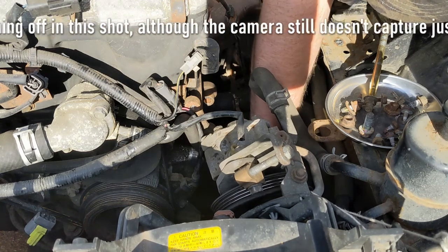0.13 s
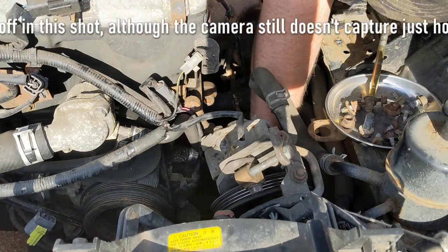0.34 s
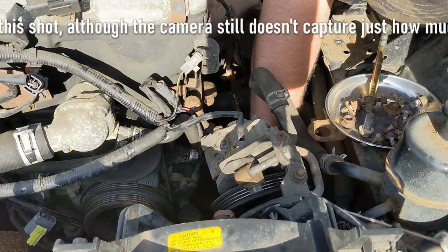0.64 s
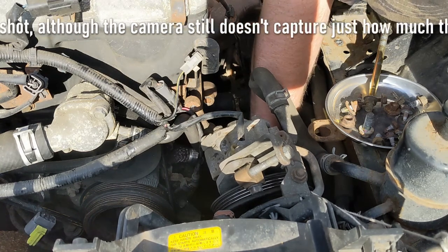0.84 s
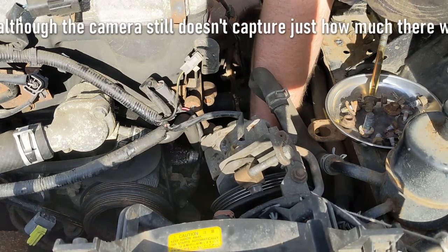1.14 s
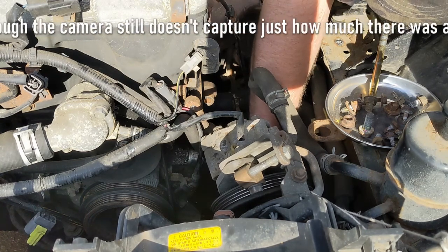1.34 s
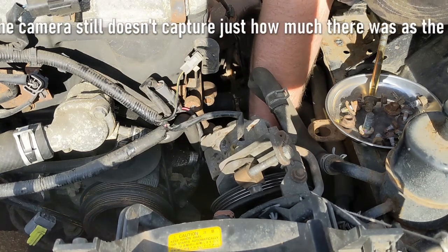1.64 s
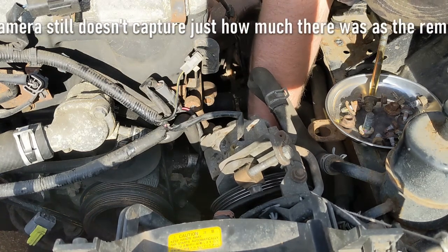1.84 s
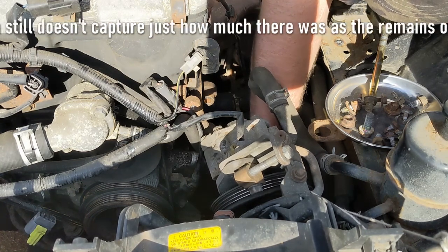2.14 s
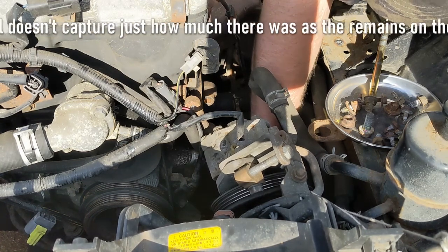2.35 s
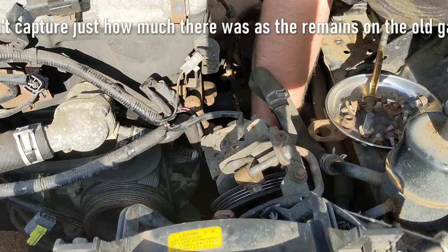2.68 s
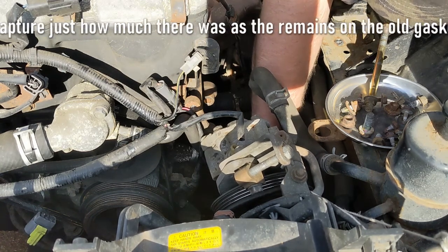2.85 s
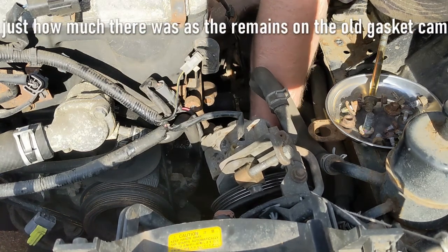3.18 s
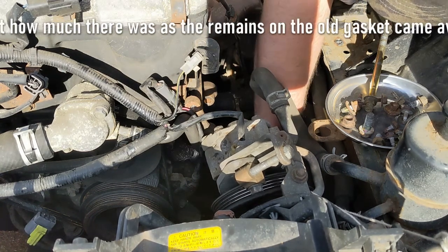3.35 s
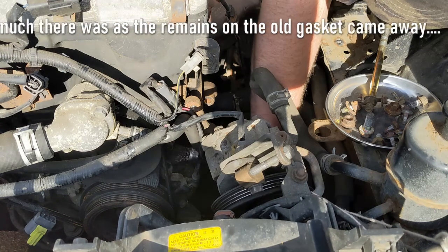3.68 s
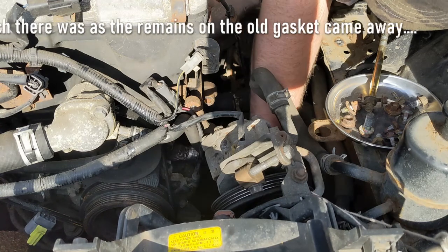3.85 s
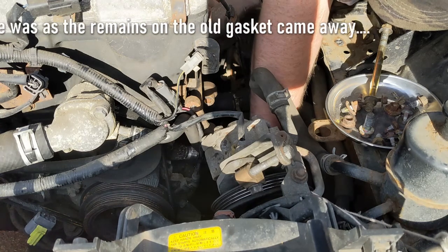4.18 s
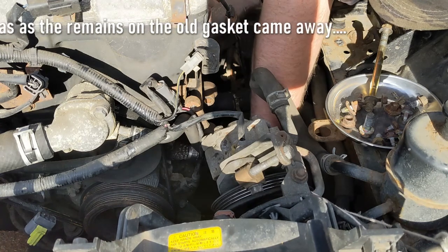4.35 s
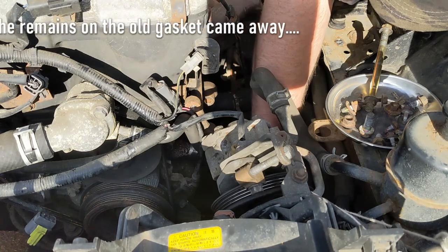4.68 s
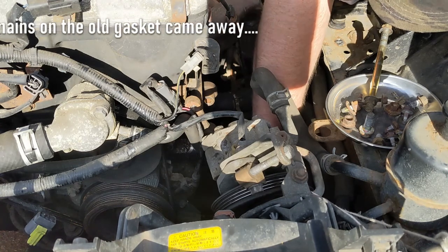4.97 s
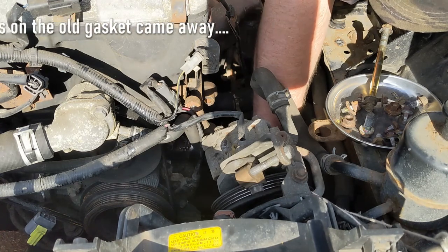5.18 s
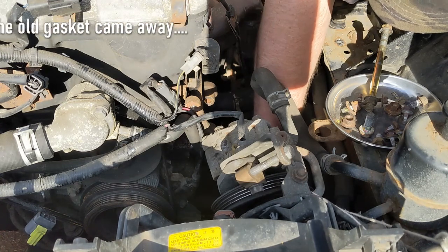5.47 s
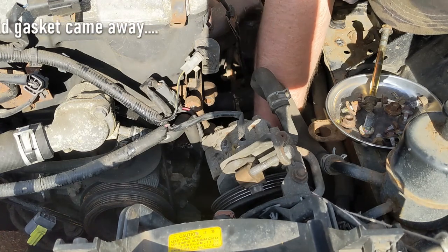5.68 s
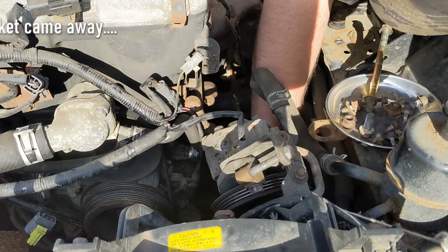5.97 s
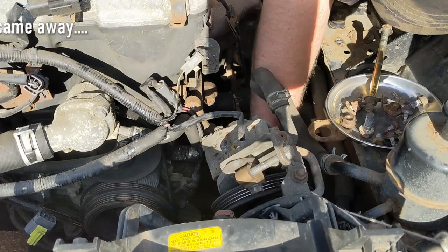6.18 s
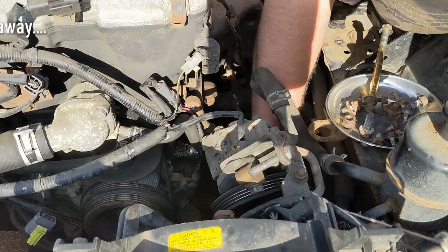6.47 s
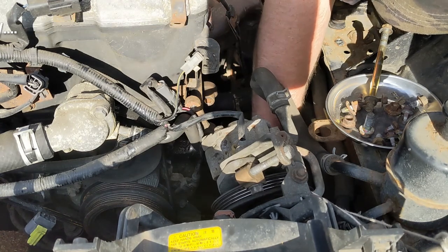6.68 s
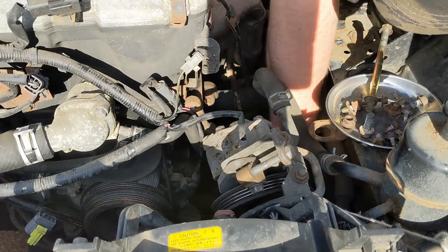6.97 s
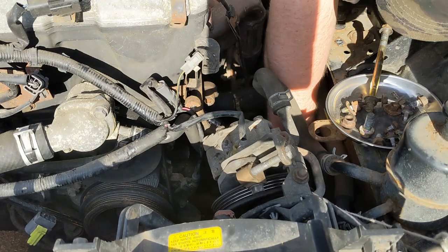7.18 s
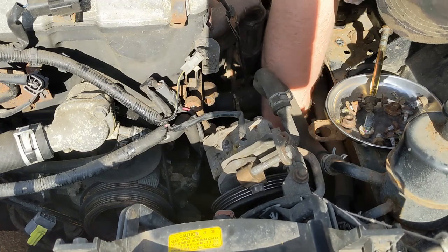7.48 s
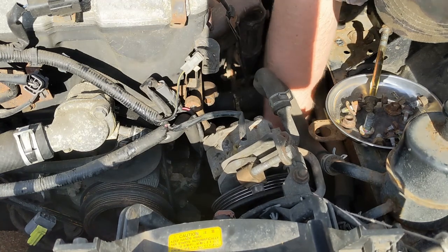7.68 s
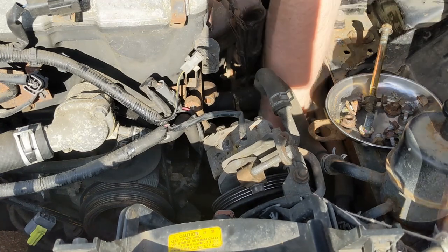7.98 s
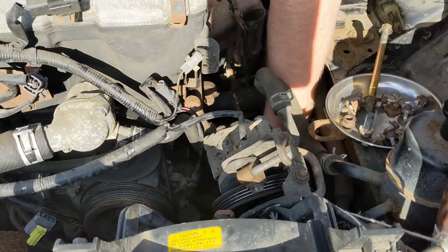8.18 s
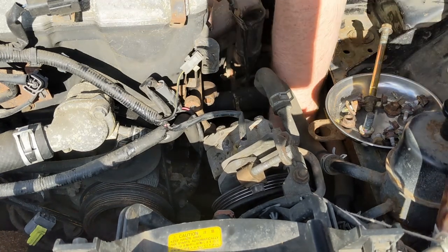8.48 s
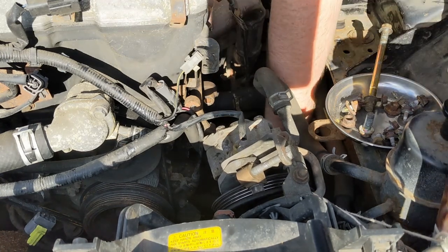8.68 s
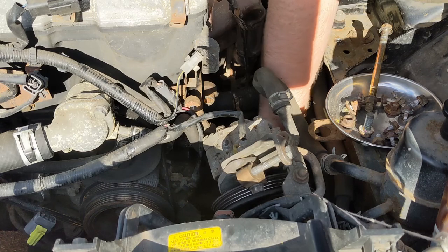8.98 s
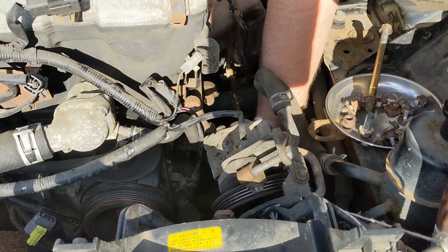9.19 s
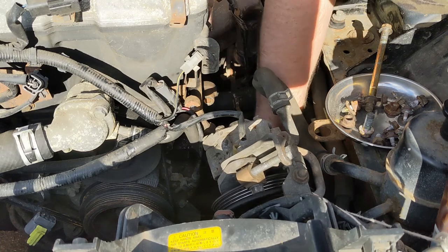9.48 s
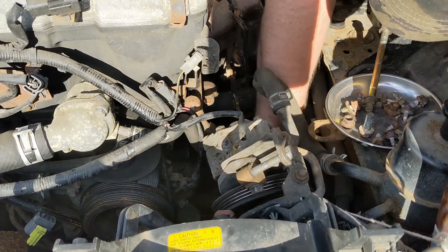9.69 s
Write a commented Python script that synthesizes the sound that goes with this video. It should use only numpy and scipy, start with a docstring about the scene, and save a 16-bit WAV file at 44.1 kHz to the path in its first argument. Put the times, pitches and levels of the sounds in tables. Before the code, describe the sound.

From 0 s a handheld air-driven polisher is already at full speed on an engine part, close and outdoors: a dense buzzing whine of many harmonics above a roughly 290 Hz shaft rate, with gritty midrange grinding and bright exhaust hiss. Pressure bends the pitch slightly down around 1.5 and 3.2 s, where a harder push makes a scraping surge and a dull thump. Low wind buffets left and right separately, strongest in the first three seconds. At 6.9 s the pad snags; the whine stops in a rapid metallic clatter. Until 8.7 s it is quiet: thin outdoor air, soft rubbing and cloth, faint squeaks around 7.2 to 7.6 and 8 s, light knocks near 7.5, 7.75 and 8.3 s, dull bumps and wind thumps. At 8.73 s a small knock, then the tool growls up within a quarter second to full whine, slightly higher, cutting off abruptly at 9.55 s.

```python
"""A buzzing whine rides on gritty grinding and rushing air: a handheld vane motor spins a polishing pad on an engine
part, outdoors. The whine is sines at multiples of the shaft speed; grind and exhaust are shaped noise pulsing once
a turn. Pressure slows the shaft and the pad chatters. The pad snags and stalls; knocks, rubbing and squeaks follow
as the tool is handled, then it spins up again. Dull thumps are sagging sines; wind noise buffets two microphone ports."""
import sys
import numpy as np
from scipy import signal
from scipy.fft import rfft, irfft, next_fast_len
from scipy.io import wavfile
from scipy.ndimage import uniform_filter1d, map_coordinates

SR = 44100
rng = np.random.default_rng(int(sys.argv[2]) if len(sys.argv) > 2 else 0)


def generate_wav(sig):
    """Save sig (samples, or channels by samples) to the path in sys.argv[1] as 16-bit PCM at SR."""
    pcm = np.round(np.clip(np.atleast_2d(sig).T, -1, 1) * 32767).astype(np.int16)
    wavfile.write(sys.argv[1], SR, pcm)


N = 433492
TIME = np.arange(N) / SR  # s

# All levels in the tables are relative; the mix below trims each layer.

# the two tool runs: (time [s], grind [dB], exhaust hiss over grind [dB], hum at the shaft rate [dB])
LONG_RUN = [(0.0, -30.5, 0.5, -64), (0.95, -31.5, 0.5, -71), (1.28, -30, -1.5, -78), (1.88, -30.5, 1, -65),
            (2.4, -30.5, -0.5, -77), (3.01, -30, 0.5, -74), (3.24, -31.5, 3.5, -74), (3.3, -31, -3.5, -55),
            (3.68, -31, -2.5, -60), (3.99, -29.5, -1, -64), (4.27, -30.5, -2, -63), (4.85, -31, -1, -61.5),
            (5.46, -30, -0.5, -57), (5.75, -30.5, 0, -59), (5.98, -31.5, -1, -51), (6.25, -29, -1.5, -65),
            (6.52, -30.5, 0, -56.5), (6.79, -30, -1, -56.5), (6.88, -33.5, 1.5, -64.5)]
SHORT_RUN = [(8.73, -56, -12, -87), (8.777, -42.5, -9, -83), (8.784, -30.5, -15, -77),
             (8.802, -28, -4, -76), (8.856, -32.5, 3, -55), (8.94, -30, -3.5, -50.5),
             (9.224, -31, -1.5, -54), (9.442, -31.5, -0.5, -68), (9.55, -32.5, 1, -63)]
# pressure on the pad slows the shaft: (time [s], shaft speed [Hz])
SHAFT_SPEED = [(0, 293.6), (.74, 292.8), (.98, 291), (1.21, 289.1), (1.56, 286.8), (1.9, 287.5),
               (1.99, 290), (2.22, 290.6), (2.29, 294.5), (2.55, 295.3), (2.75, 295), (2.95, 291.5),
               (3.12, 287.7), (3.2, 283), (3.24, 284.5), (3.33, 295.6), (3.43, 297.8), (3.74, 297.4),
               (3.99, 293.2), (4.13, 292.3), (4.5, 294.6), (4.95, 295.6), (5.18, 294.9), (5.42, 293.5),
               (5.64, 293.6), (6, 296), (6.19, 292.7), (6.36, 290.1), (6.46, 290.2), (6.58, 293.6),
               (6.72, 292.2), (6.82, 293.3), (6.88, 282), (8.73, 172.5), (8.776, 180.3), (8.802, 212.7),
               (8.856, 270.6), (8.882, 282.4), (8.94, 294), (8.99, 297.7), (9.09, 298.5), (9.224, 296.6),
               (9.44, 298.5), (9.55, 297.8)]
# strong lines: (multiple of the shaft [ratio]); the last is the pad chatter
STRONG_LINES = np.array([3, 6, 9, 12, 15, 24, 27, 30, 33, 36, 39, 48, 28 / 3])
# echoes in the engine bay colour each strong line differently at each port as the speed moves it.
# shaft speeds of the first five columns in the three tables below: (speed [Hz])
COLUMN_SPEEDS = [287.3, 290.4, 292.8, 294.6, 297.1]
# a row per strong line, the sixth column holds for the whole second run: (left level [dB] x 6)
LINE_LEFT = [(-49, -46, -56, -59, -64, -54), (-52, -63, -62, -58, -55, -56), (-56, -59, -48, -44, -45, -55),
             (-46, -46, -38.5, -42.5, -46, -51), (-55, -55, -41.5, -38.5, -49, -52),
             (-40, -34.5, -32.5, -32.5, -28, -35.5), (-47, -49, -50, -43, -46, -48),
             (-44, -47, -55, -45, -39, -42.5), (-51, -51, -47, -45, -39, -36.5),
             (-54, -50, -38, -50, -53, -43.5), (-44, -34, -53, -47, -40, -42),
             (-54, -57, -46, -51, -52, -47), (-41.5, -50, -58, -57, -59, -62)]
# same layout: (right level [dB] x 6)
LINE_RIGHT = [(-42, -39.5, -44, -43.5, -42.5, -51), (-44, -50.5, -43, -41.5, -47, -39.5),
              (-50, -55.5, -38, -37, -35.5, -37.5), (-36, -43, -38, -39.5, -47, -35.5),
              (-53, -43, -58, -42, -41, -37), (-34.5, -33.5, -33.5, -38.5, -49, -34),
              (-52, -48, -43, -42, -45, -41.5), (-39, -40, -52.5, -56, -41, -46),
              (-30.5, -43.5, -47, -42, -40.5, -40), (-48, -48, -46, -49, -43, -52),
              (-41, -39, -46, -41.5, -43, -41.5), (-41.5, -46, -42.5, -43, -39, -42),
              (-33.5, -40, -55.5, -62, -61, -53.5)]
# same layout: (phase by which the left leads [rad] x 6)
LINE_LEAD = [(0.1, -4.7, -1.3, -2, -2, 0), (0.3, -4.5, 0, -3.3, -1.5, -1.5), (-0.3, 7, -3.5, 1.4, 0.6, 3),
             (4, -0.2, -2.4, 0.9, 4, 1), (1.3, 2.3, 4, 4, 0, 1.5), (-2, -2.5, -2.5, -2.32, 1.3, 1.34),
             (-1, -2.5, -0.5, -2.4, -1.2, -4.5), (1.4, 1.7, 0, -4, -2, -5.5),
             (0.1, -1.5, -0.5, -2.5, -2, -2.5), (4.5, -5.5, -8.5, -1.5, 9, -8), (1.5, 3, 2.3, 0.6, 2, 4),
             (-6.5, -4, -3, 4, -5, -5), (0.5, -2.7, 1, 13, 2.2, 3)]
# weaker shaft orders: (multiple of the shaft [ratio], left level [dB], right level [dB])
WEAK_ORDERS = [(2, -55.5, -53.5), (18, -49, -53), (21, -51.5, -55), (25, -52.5, -45), (26, -53, -51),
               (28, -53, -52), (29, -59.5, -52.5), (31, -50.5, -50), (32, -62, -49), (34, -48, -54),
               (35, -58.5, -53.5), (37, -48.5, -47), (38, -55.5, -52.5), (40, -49.5, -47), (41, -51.5, -54),
               (42, -52.5, -48), (44, -58.5, -54), (45, -54, -55), (47, -58.5, -51), (49, -57.5, -48),
               (50, -57, -45.5), (51, -56, -45), (52, -54.5, -46), (53, -65, -54)]
# colour of the grinding noise: (frequency [Hz], level [dB])
GRIND_COLOUR = [(150, -50.5), (250, -20.5), (296, -22), (452, -24), (576, -6.5), (798, -11), (879, -10),
                (957, -10.5), (1390, -2.5), (1590, -18), (1770, 3), (1950, 1), (2370, -2), (3800, -5),
                (4500, -6), (5850, -25), (9900, -120)]
# colour of the exhaust air: (frequency [Hz], level [dB])
EXHAUST_COLOUR = [(2060, -22.5), (3500, -3), (3800, -20), (4440, -4.5), (5680, -5.5), (6810, -7.5),
                  (8870, -5), (10200, -11), (13000, -11.5), (14300, -8), (15700, -9.5)]
# stereo lean of grind and exhaust: (frequency [Hz], left over right [dB])
TOOL_LEAN = [(60, 6), (99, 6), (160, -10.5), (270, 0), (450, -2), (740, -5.5), (1220, -4), (2010, -2.5),
             (3330, -3.5), (5500, -3.5), (9080, -2), (15000, -6.5)]
# resonances of the housing and the part under the pad: (frequency [Hz], width [Hz], level [dB])
HOUSING_MODES = [(552, 30, 7), (680, 31.3, 3.5), (1176, 370, 3.5), (1780, 100, 0), (2359, 96, 9.5),
                 (4500, 820, -2.5)]
# resonances of the exhaust port: (frequency [Hz], width [Hz], level [dB])
PORT_MODES = [(6730, 460, 2), (9160, 2100, -10.5), (11940, 170, -8.5), (14800, 720, -7.5)]
# loose vanes, pad scrape and low drone: (frequency [Hz], width [Hz], level [dB])
RATTLE_MODES = [(540, 70, 0), (680, 90, -1)]
SCRAPE_MODES = [(2390, 400, 0), (3300, 900, -5.5), (4730, 350, 2.0)]
DRONE_MODES = [(382, 140, 0)]
# tool against metal:
# (time [s], level [dB], low knock [dB], bright ring [dB], noise decay t60 [s], left over right [dB])
KNOCKS = [(6.8848, -9.5, -14, -9, 0.058, -9), (6.8918, -11, -8, 1.5, 0.091, -9),
          (6.8964, -9, -16, -13, 0.085, -1), (6.9053, -18.5, -8, 3, 0.08, -7.5),
          (6.9094, -17, -32, -20, 0.06, -6.5), (6.9238, -18.5, -23.5, -6, 0.11, -7.5),
          (6.9363, -27.5, -2, 6.5, 0.051, -8.5), (7.0004, -44, -3.5, -1, 0.092, -7),
          (7.5047, -24, -12, 0.5, 0.063, -6), (7.5166, -28.5, -6.5, -10.5, 0.078, -10),
          (7.7491, -30, 7, -10, 0.11, -5.5), (7.8025, -47.5, -1, -16, 0.16, -10),
          (7.9533, -58, 4, -16, 0.048, -1.0), (8.0254, -46.5, -25, -2, 0.06, -12.5),
          (8.2577, -39, -1, -6, 0.12, -6.5), (8.3584, -40.5, -7, 0, 0.083, -7),
          (8.7306, -35, -21.5, -27, 0.06, -16.5), (8.7829, -21, -7.5, -17, 0.06, -1.5)]
# modes of the struck part, low to high: (frequency [Hz], width [Hz], level [dB])
LOW_MODES = [(390, 420, -7), (652, 91, 10)]
MID_MODES = [(1195, 280, -2.5), (2000, 400, 1.5), (3230, 950, -7)]
HIGH_MODES = [(4490, 490, 6), (8440, 2000, -5.5), (11700, 13000, -13)]
# dull thumps with sagging pitch:
# (time [s], level [dB], first pitch [Hz], last pitch [Hz], decay t60 [s], left over right [dB])
THUMPS = [(.318, -29, 312, 131, 0.083, -23), (0.89, -33.5, 590, 136, 0.11, 28),
          (3.288, -24.5, 746, 720, 0.11, -10), (7.751, -36, 700, 119, 0.57, -2),
          (7.953, -35.5, 750, 116, 0.13, 25), (8.225, -42, 503, 151, 0.091, 20)]
# steady wind on the ports: (time [s], level [dB])
STEADY_WIND = [(0.0, -60), (0.23, -57), (2.13, -62.5), (2.94, -55.5), (3.63, -67), (4.29, -66.5),
               (4.79, -56), (5.08, -64), (5.63, -59), (6.48, -68.5), (6.76, -65), (7.34, -64), (7.82, -61),
               (7.98, -65.5), (8.29, -58), (8.5, -69), (8.79, -75), (9.11, -56), (9.4, -63), (9.45, -76)]
# single eddies: (time [s], level [dB], left over right [dB], decay t60 [s], starting pitch of the push [Hz])
GUSTS = [(0.044, -42, 23, 0.22, 105), (0.119, -45, -0.5, 0.22, 61.9), (0.191, -40, -16, 0.22, 159),
         (0.268, -36, -28, 0.21, 167), (0.319, -28, -22.5, 0.2, 231), (0.446, -32, 11, 0.22, 86.1),
         (0.613, -33.5, 14, 0.19, 213), (0.789, -50, -2.5, 0.22, 86.1), (0.894, -29.5, 27.5, 0.22, 186),
         (0.958, -34, -1.5, 0.27, 199), (1.041, -33.5, 10, 0.2, 186), (1.121, -36, 21, 0.16, 88.8),
         (1.221, -41, 13, 0.22, 170), (1.289, -40, -12, 0.22, 86.1), (1.482, -39.5, 29, 0.19, 191),
         (1.53, -43, 14, 0.19, 175), (1.651, -42, 21, 0.2, 199), (1.782, -37, 13, 0.22, 118),
         (1.819, -37, 12, 0.22, 80.7), (1.867, -40, -6, 0.22, 88.8), (1.919, -44, -13, 0.22, 72.7),
         (2.133, -42, 11.5, 0.25, 108), (2.229, -33.5, 24.5, 0.24, 228), (2.309, -32, 4.5, 0.27, 105),
         (2.392, -34, 14, 0.17, 170), (2.429, -45, -8, 0.2, 75.4), (2.557, -38, 9.0, 0.22, 113),
         (2.612, -48, 5, 0.26, 96.9), (2.681, -32, -7, 0.2, 80.7), (2.759, -33, 7, 0.22, 159),
         (2.829, -39, 14.0, 0.2, 102), (2.917, -35.5, -11, 0.22, 156), (2.959, -41, 2, 0.22, 132),
         (3.072, -39, 22.0, 0.19, 186), (3.139, -44, 17, 0.22, 137), (3.279, -24, 4, 0.25, 94.2),
         (3.349, -37, 11, 0.25, 110), (3.408, -36, 10, 0.21, 143), (4.122, -49, 6.5, 0.22, 96.9),
         (4.628, -36, 18, 0.22, 196), (4.689, -38, 7.5, 0.22, 64.6), (4.768, -42, 15, 0.15, 108),
         (4.849, -44.5, -12, 0.22, 156), (4.94, -38, 17.0, 0.22, 88.8), (5.149, -53, -4.0, 0.22, 61.9),
         (6.63, -39.5, -6, 0.22, 223), (6.739, -46.5, -4.0, 0.22, 99.6), (6.987, -44, 10.0, 0.24, 80.7),
         (7.331, -44, -8, 0.25, 83.4), (7.772, -30, -5.5, 0.28, 116), (7.858, -34, 11, 0.24, 110),
         (7.948, -31.5, 25, 0.15, 229), (8.096, -43, 24, 0.22, 96.9), (8.222, -37.5, 16, 0.22, 83.4),
         (8.299, -48.5, 1.0, 0.22, 61.9), (8.369, -43, 6.5, 0.26, 110), (8.889, -44, -7.0, 0.22, 194),
         (8.976, -36, 13, 0.22, 91.5), (9.06, -27, 12.5, 0.19, 170), (9.29, -34.5, 20, 0.21, 172),
         (9.446, -37.5, 11.0, 0.26, 153)]
# colour of the wind rumble: (frequency [Hz], level [dB])
BUFFET_COLOUR = [(15, -47), (25, 1.5), (91, 16), (299, 2.5), (430, -32), (568, -20.5), (700, -25.5),
                 (910, -36), (1540, -120)]
# brighter band of strong eddies: (frequency [Hz], width [Hz], level [dB])
FLAP_MODES = [(317, 61, 0)]
# hand and sleeve on the engine: (time [s], rubbing [dB], treble of the cloth [dB])
RUSTLE = [(6.94, -57, -71), (6.986, -51, -56), (7.072, -61, -75.5), (7.462, -57.5, -80.5),
          (7.774, -67, -66), (7.908, -63, -61), (8.18, -63, -62), (8.43, -68.5, -53.5), (8.63, -58, -57),
          (8.78, -59.5, -54)]
# the engine as it is rubbed, and the cloth: (frequency [Hz], width [Hz], level [dB])
RUB_MODES = [(470, 90, 3), (1300, 500, -7), (2300, 400, 0)]
CLOTH_MODES = [(4500, 2800, 0.18), (13000, 9000, 1.5)]
# colour of the steady air: (frequency [Hz], level [dB])
AIR_COLOUR = [(60, -19.5), (300, 1.5), (400, -9), (470, 3.5), (560, -5), (1400, -7.5), (1650, -16),
              (2400, -13), (4000, -11), (16000, -21.5)]
# faint squeaks and chirps: (time [s], length [s], from [Hz], to [Hz], level [dB])
CHIRPS = [(7.192, 0.07, 2250, 2570, -61), (7.31, 0.098, 2380, 2000, -60), (7.64, .09, 2420, 2290, -61),
          (8.07, .04, 1800, 2000, -60), (7.424, .014, 2900, 4200, -55), (7.441, .01, 3300, 4200, -56),
          (7.975, .012, 3300, 4100, -56), (7.993, .01, 3300, 4200, -55)]

FULL_SPEED_HZ, FULL_GRIND_DB = 297, -31
HEAVE_S, HEAVE_WIDTH_S, HEAVE_DB = 3.07, 0.13, 4.5  # one hard push makes the scrape surge
LINE_DRIFT_DB = 1.38  # depth of the slow random drift of a strong line
# spinning up, the lowest line growls and higher ones fade: dB at full slack, the second per multiple
GROWL_DB, SPIN_UP_FADE_DB = 44, 2.5
GUST_RISE_S, GUST_TRIM_DB, PUSH_TRIM_DB = 0.0089, -7, -5
PUSH_SAG = 8  # exponential fall of the push pitch, per second
WIND_SWAY_DB, WIND_FLUTTER_DB = 7, 3
FADE_START_S, TOP_HZ = 9.548, 15790


def amp(db):
    """Turns dB into gain."""
    return 10 ** (np.asarray(db) / 20)


def unit(x):
    """Scales a sound to rms 1."""
    return x / np.sqrt(np.mean(x ** 2) + 1e-20)


def along(points, hz):
    """Reads (frequency, value) points on a log frequency axis."""
    f, v = np.transpose(points)
    return np.interp(np.log(hz + 1), np.log(f + 1), v)


def curves(rows):
    """Draws one automation curve for each column after the time."""
    s, *cols = np.transpose(rows)
    return np.array([np.interp(TIME, s, c) for c in cols])


def wobble(rate):
    """Random modulation: straight lines between random knots, rate knots a second, at most 200."""
    knots = rng.standard_normal(int(N * 200 / SR) + 4)
    return map_coordinates(knots, [np.arange(N) * min(rate, 200) / SR], order=1)


def filtered(x, response):
    """Filters x by a complex response of frequency."""
    m = next_fast_len(x.shape[-1] + 8192)
    spectrum = rfft(x, m) * response(np.fft.rfftfreq(m, 1 / SR))
    return irfft(spectrum, m)[..., :x.shape[-1]]


def modes(table):
    """The causal response of a few resonances, summed with alternating sign."""
    def response(f):
        total = 0
        for k, (center, width, db) in enumerate(table):
            damping = 1j * f * width
            total = total + (-1) ** k * amp(db) * damping / (center * center - f * f + damping)
        return total
    return response


def patchy(patchy_db):
    """Two white noises that share patches of random gain across time and frequency."""
    z = signal.stft(rng.standard_normal((2, N)), nperseg=512)[2]
    field = uniform_filter1d(rng.standard_normal(z.shape[1:]), 6, 0)
    field = uniform_filter1d(field, 12, 1)
    return signal.istft(z * amp(patchy_db * unit(field)), nperseg=512)[1][:, :N]


def near(shared, patchy_db):
    """A moving source at two ports: a shared part with wandering timing on the left, plus the left's own part."""
    right, left_own = patchy(patchy_db)
    lag = SR * (-.000072 + .00001 * wobble(0.95))  # samples; negative means the left is early
    moved = map_coordinates(right, [np.arange(N) - lag], order=3, mode="mirror")
    share = np.clip(shared, 0, 1)
    return np.array([share * moved + np.sqrt(1 - share ** 2) * left_own, right])


def sides(pan_db):
    """Left and right gains for a level difference."""
    return amp(np.multiply.outer([.5, -.5], pan_db))


def pan(pan_db):
    """Fixed left and right gains, shaped to multiply a sound."""
    return sides(pan_db)[:, None]


def shaft_lines(turn, speed, slack, grind_db):
    """Strong shaft multiples and pad chatter: echoes set each line's level and phase as the speed moves."""
    second_run_s = SHORT_RUN[0][0]

    def at_speed(row):
        return np.where(TIME < second_run_s, np.interp(speed, COLUMN_SPEEDS, row[:-1]), row[-1])

    out = np.zeros((2, N))
    for k, left_db, right_db, lead in zip(STRONG_LINES, LINE_LEFT, LINE_RIGHT, LINE_LEAD):
        spin_up_db = slack ** 0.75 * GROWL_DB * (k == 3) - slack * SPIN_UP_FADE_DB * (k - 3)
        spin_up_db = spin_up_db * (TIME > second_run_s)
        level = amp(grind_db - FULL_GRIND_DB + 3 + spin_up_db + LINE_DRIFT_DB * wobble(5))
        roughness = 1 + (0.24 + .6 * slack) * wobble(70)
        phase = [at_speed(lead) + 0.3 * wobble(3), np.zeros(N)]
        out += level * roughness * amp([at_speed(left_db), at_speed(right_db)]) * np.sin(k * turn + phase)
    return out


def weak_orders(turn, slack):
    """Weaker shaft multiples: faint sines whose levels waver at random, partly separately at each port."""
    out = np.zeros((2, N))
    for k, *db in WEAK_ORDERS:
        port_waver_db = 3.2 * np.array([wobble(4), wobble(4)])
        level = amp(np.array(db)[:, None] + 2.0 - 90 * slack + port_waver_db + 3 * wobble(25))
        out += level * np.sin(k * turn + rng.uniform(0, 2 * np.pi, (2, 1)))
    return out


def grind_and_exhaust(turn, grind_db, hiss_db):
    """Pad grit rings the housing and air rushes through the port, both pulsing once a turn."""
    def coloured(colour, resonances):
        ring = modes(resonances)
        return lambda hz: amp(along(colour, hz)) * sides(along(TOOL_LEAN, hz)) * (1 + abs(ring(hz)))

    grind = unit(filtered(near(0.54, patchy_db=1.0), coloured(GRIND_COLOUR, HOUSING_MODES)))
    hiss = unit(filtered(near(0.29, patchy_db=1.3), coloured(EXHAUST_COLOUR, PORT_MODES)))
    out = amp(grind_db) * grind * (1 + 0.12 * np.sin(turn))
    return out + amp(grind_db + hiss_db + 2) * hiss * (1 + .15 * np.sin(turn))


def rattle_and_scrape(slack, grind_db):
    """Loose vanes rattle the lowest housing modes; pressure on the pad adds a scrape in the first run."""
    rattle = unit(filtered(near(.8, patchy_db=1.5), modes(RATTLE_MODES)))
    scrape = unit(filtered(near(.5, patchy_db=2.0), modes(SCRAPE_MODES)))
    heave_db = HEAVE_DB * np.exp(-((TIME - HEAVE_S) / HEAVE_WIDTH_S) ** 2)
    first_run = TIME < SHORT_RUN[0][0]
    out = amp(grind_db + 1.5) * slack * rattle * pan(-5)
    return out + amp(grind_db + 27.5 + heave_db) * slack * first_run * scrape * pan(-2.5)


def hum_and_drone(turn, hum_db):
    """A fluttering sine at the shaft rate, with a low drone of noise that grows with it."""
    hum = (1 + 0.46 * wobble(70)) * np.sin(turn + [[-.47], [0]])
    drone = unit(filtered(patchy(patchy_db=3.0)[0], modes(DRONE_MODES)))
    return amp(hum_db + 2.5) * hum * pan(-3) + amp(0.63 * hum_db - 21) * drone * pan(-3.5)


def tool():
    """One shaft drives every layer: below full speed the vanes seat badly, lines roughen and weak orders fade."""
    speed, = curves(SHAFT_SPEED)
    grind_db, hiss_db, hum_db = curves(list(LONG_RUN) + list(SHORT_RUN))
    stop_s, start_s = LONG_RUN[-1][0], SHORT_RUN[0][0]
    running = np.interp(TIME, [stop_s, stop_s + .065, start_s, start_s + .003], [1, 0, 0, 1])
    turn = 2 * np.pi * np.cumsum(speed * (1 + 0.000299 * wobble(25))) / SR  # shaft angle, rad
    slack = np.clip(1 - speed / FULL_SPEED_HZ, 0, 1)
    out = shaft_lines(turn, speed, slack, grind_db) + weak_orders(turn, slack)
    out += grind_and_exhaust(turn, grind_db, hiss_db)
    out += rattle_and_scrape(slack, grind_db) + hum_and_drone(turn, hum_db)
    return out * running


def knocks():
    """Each contact is a short rattle of noise that shakes the modes of the part."""
    out, t = np.zeros((2, N + SR)), np.arange(SR // 4) / SR
    for s, db, low_db, high_db, t60, pan_db in KNOCKS:
        envelope = amp(-60 * t / t60) * (1 - np.exp(-t / 0.00027))
        a, b = rng.standard_normal((2, len(t))) * envelope
        pair = np.array([a, 0.18 * a + 0.77 * b])
        blow = 0
        for table, level_db in [(LOW_MODES, low_db), (MID_MODES, 0), (HIGH_MODES, high_db)]:
            shaken = filtered(pair, modes(table))
            blow = blow + amp(level_db) * shaken / abs(shaken).max()
        out[:, round(s * SR):][:, :len(t)] += amp(db + 2) * pan(pan_db) * blow
    return out[:, :N]


def thumps():
    """A damped swing whose pitch falls fast at first."""
    out, t = np.zeros((2, N + SR)), np.arange(SR // 3) / SR
    for s, db, first_hz, last_hz, t60, pan_db in THUMPS:
        pitch = last_hz + (first_hz - last_hz) * np.exp(-t / 0.00444)
        envelope = amp(db - 60 * t / t60) * (1 - np.exp(-t / 0.0016))
        swing = np.sin(2 * np.pi * np.cumsum(pitch) / SR) * envelope
        out[:, round(s * SR):][:, :len(t)] += pan(pan_db) * swing
    return out[:, :N]


def wind():
    """Eddies thump each port on its own: single gusts over a wind that sways from side to side."""
    db, = curves(STEADY_WIND)
    lumps = amp(2.14 * np.array([wobble(30), wobble(30)]))
    rumble = filtered(rng.standard_normal((2, N)), lambda hz: amp(along(BUFFET_COLOUR, hz)))
    flap = filtered(rng.standard_normal((2, N)), modes(FLAP_MODES))
    steady = amp(db + 2.5 + WIND_FLUTTER_DB * wobble(10)) * sides(WIND_SWAY_DB * wobble(12))
    level = np.pad(steady, [(0, 0), (0, SR)])
    pushes = np.zeros_like(level)
    t = np.arange(SR // 2) / SR
    phases = rng.uniform(0, 2 * np.pi, (len(GUSTS), 2, 1))
    for (s, gust_db, pan_db, t60, hz), phase in zip(GUSTS, phases):
        shape = pan(pan_db) * np.clip(t / GUST_RISE_S, 0, 1) * amp(-60 * t / t60)
        swing = np.sin(2 * np.pi * hz * np.cumsum(np.exp(-PUSH_SAG * t)) / SR + phase)
        level[:, round(s * SR):][:, :len(t)] += amp(gust_db + GUST_TRIM_DB) * shape
        pushes[:, round(s * SR):][:, :len(t)] += amp(gust_db + PUSH_TRIM_DB) * shape * swing
    level = level[:, :N]
    # strong eddies are brighter: their upper part grows with the square of the level
    return pushes[:, :N] + level * unit(lumps * rumble) + amp(19.5) * level ** 2 * unit(flap)


def rustle():
    """Soft rubbing noise rings the engine's modes under a faint hiss of cloth."""
    rub_db, cloth_db = curves(RUSTLE)
    rub = unit(filtered(patchy(patchy_db=2.5), modes(RUB_MODES)))
    cloth = unit(filtered(patchy(patchy_db=1), modes(CLOTH_MODES)))
    return pan(-3.5) * (amp(rub_db) * rub + amp(cloth_db - 3.5) * cloth)


def chirps():
    """Thin squeaks: short gliding sines with a slightly unsteady phase."""
    out = np.zeros((2, N))
    for s, length, from_hz, to_hz, db in CHIRPS:
        count = round(length * SR)
        glide = 2 * np.pi * np.cumsum(np.linspace(from_hz, to_hz, count)) / SR
        jitter = np.cumsum(rng.normal(0, 0.05, count))
        out[:, round(s * SR):][:, :count] += amp(db) * np.hanning(count) * np.sin(glide + jitter)
    return out


def yard_air():
    """Steady outdoor air: quiet coloured noise."""
    air = unit(filtered(patchy(patchy_db=2.5), lambda hz: amp(along(AIR_COLOUR, hz))))
    return pan(-3.5) * amp(-57.5) * air


def scene():
    """Sums all sources at the two ports."""
    return tool() + knocks() + thumps() + wind() + rustle() + chirps() + yard_air()


def record(dry):
    """The microphones drop the deep bass and all above the band limit; a fast fade closes the sound."""
    fade = amp(np.clip(-2500 * (TIME - FADE_START_S), -200, 0))  # falls 2500 dB a second
    fade = fade * (TIME < FADE_START_S + .025)
    band = filtered(dry, lambda hz: (1j * hz / (45 + 1j * hz)) ** 2 * (hz < TOP_HZ))
    return band * fade


dry = scene()
out = record(dry)
generate_wav(out)
```